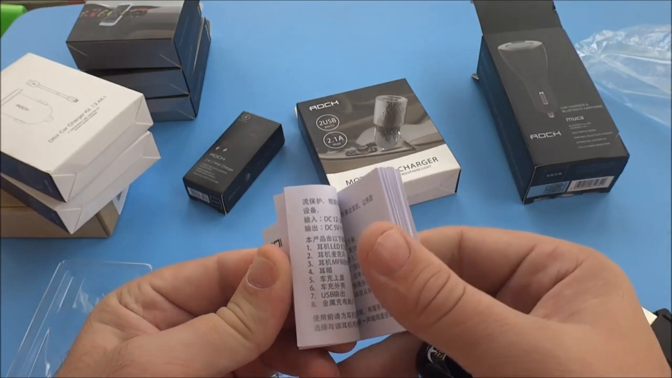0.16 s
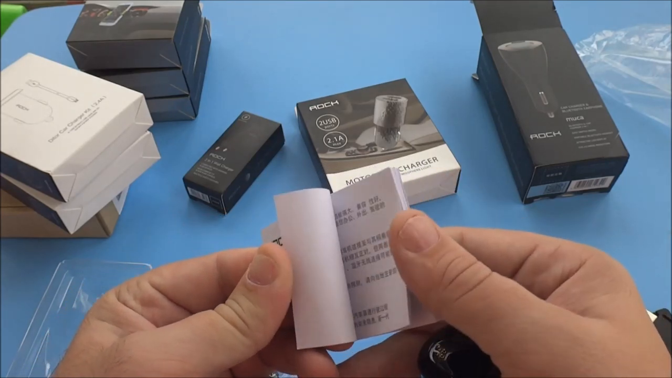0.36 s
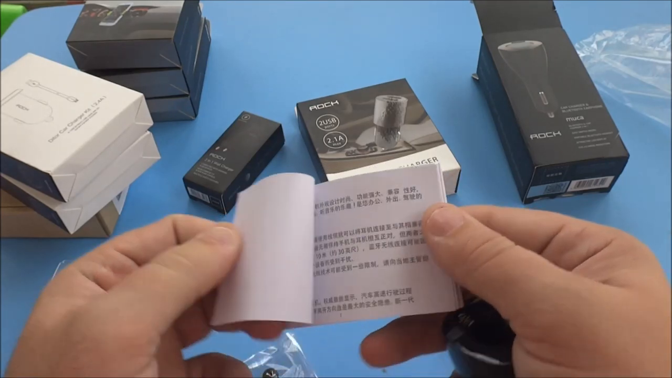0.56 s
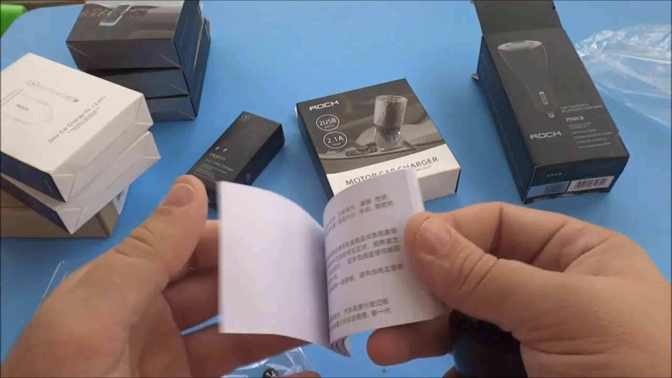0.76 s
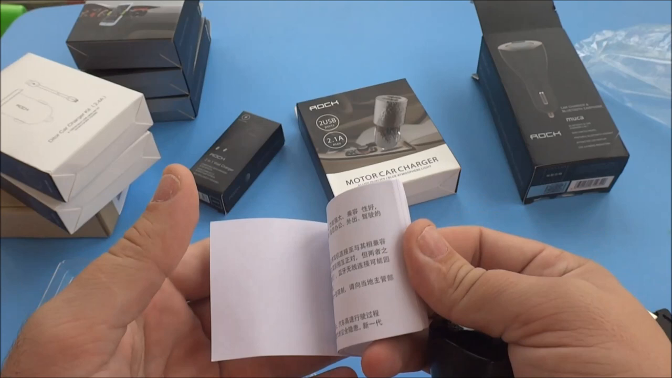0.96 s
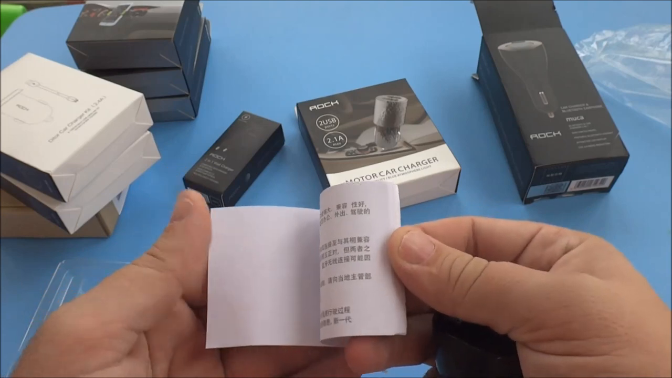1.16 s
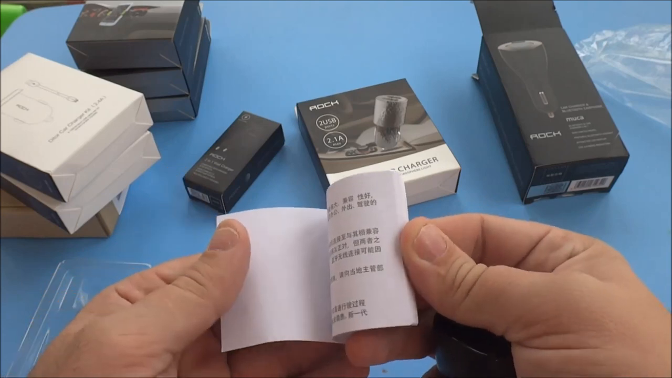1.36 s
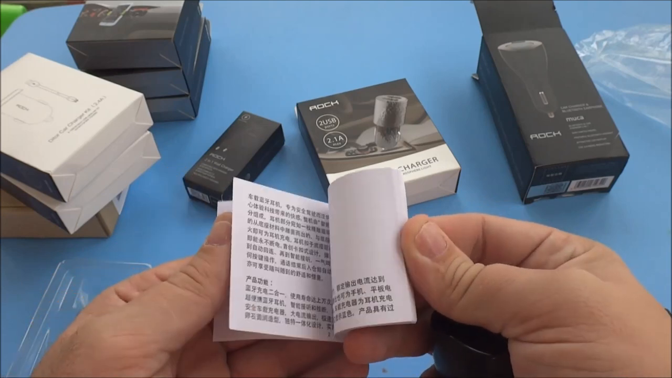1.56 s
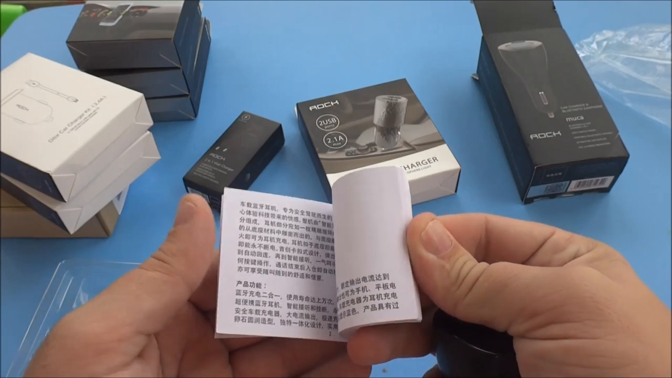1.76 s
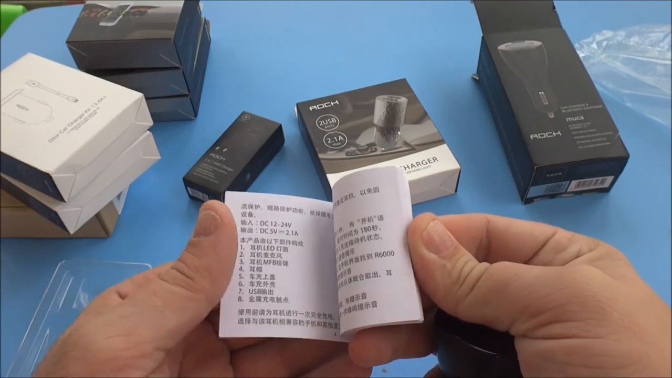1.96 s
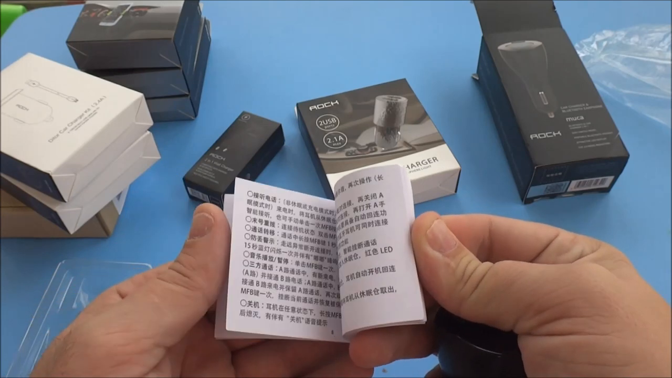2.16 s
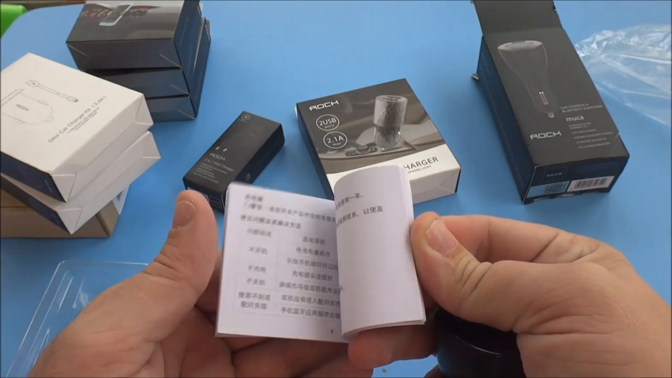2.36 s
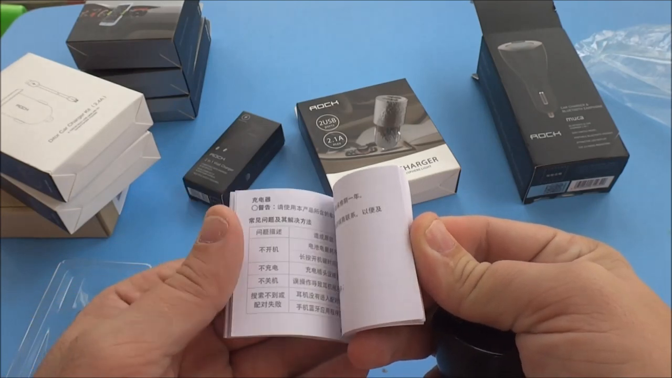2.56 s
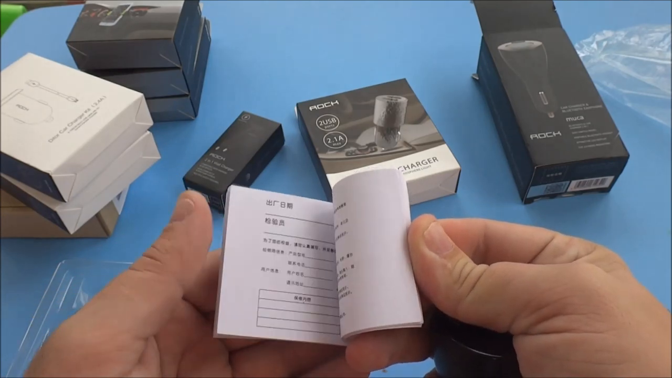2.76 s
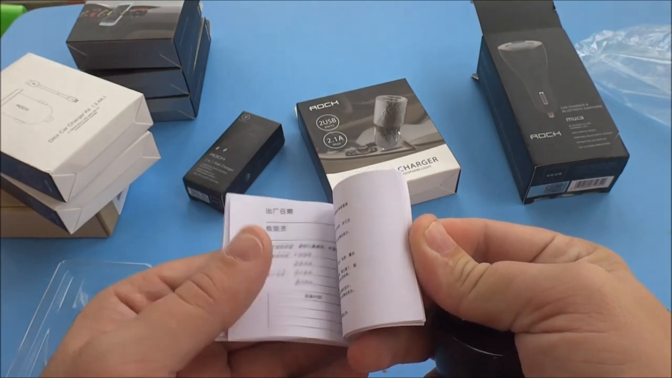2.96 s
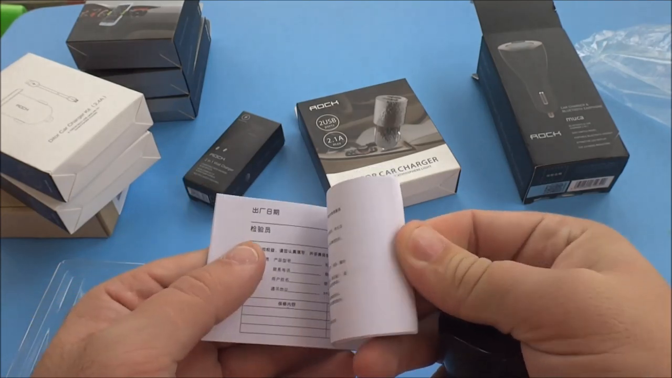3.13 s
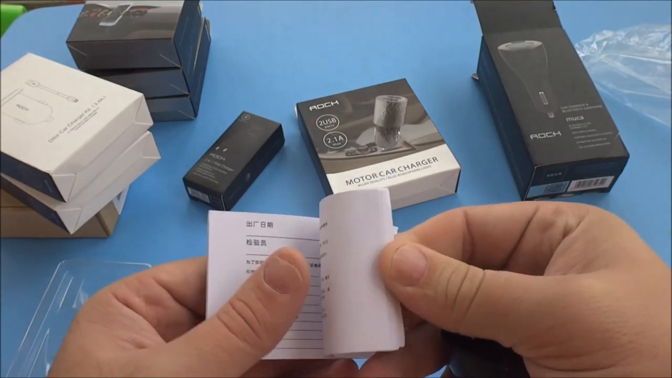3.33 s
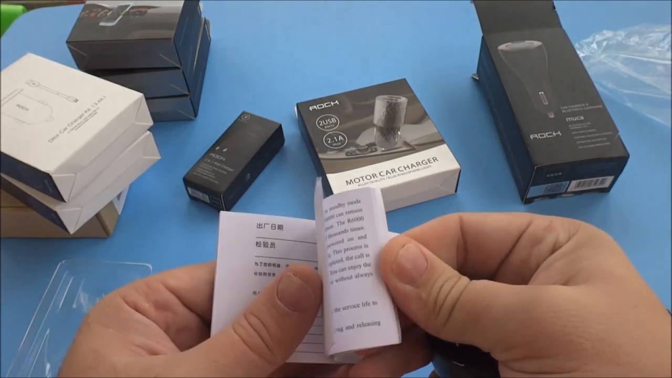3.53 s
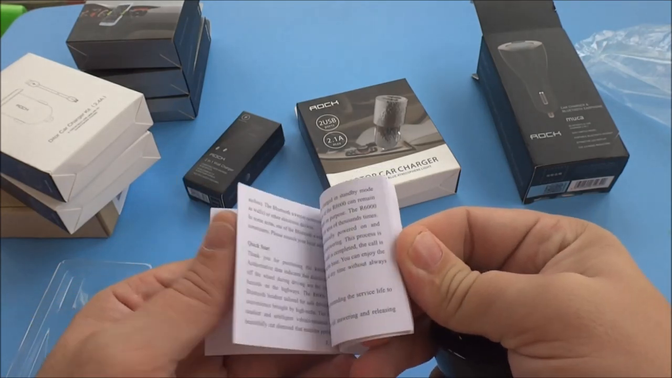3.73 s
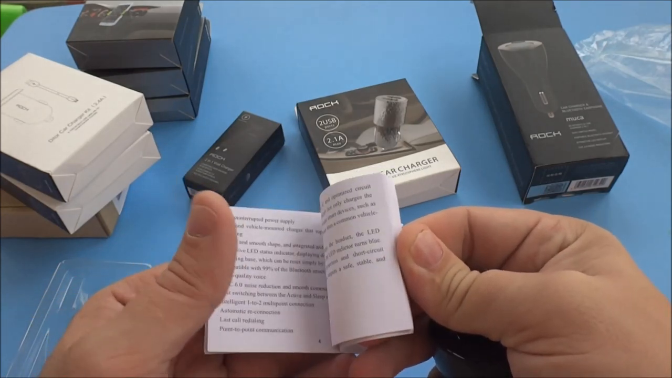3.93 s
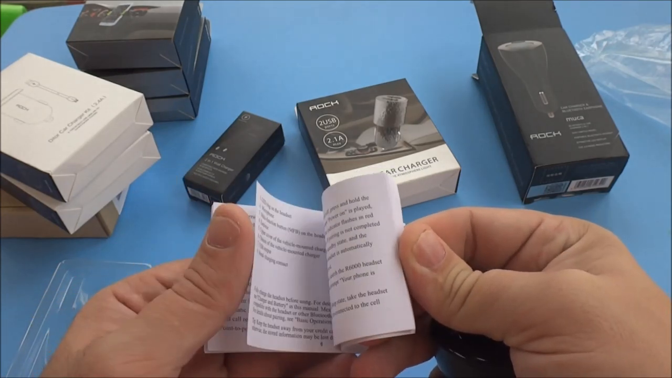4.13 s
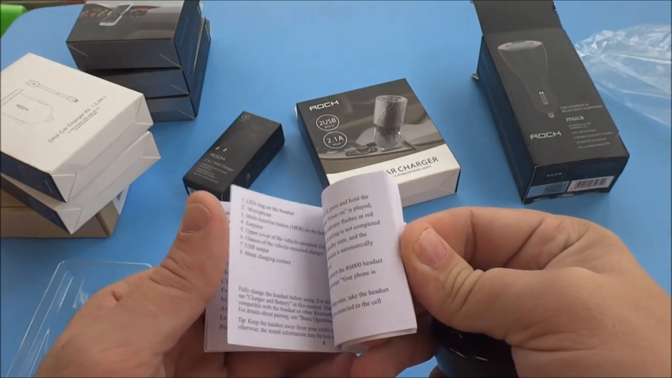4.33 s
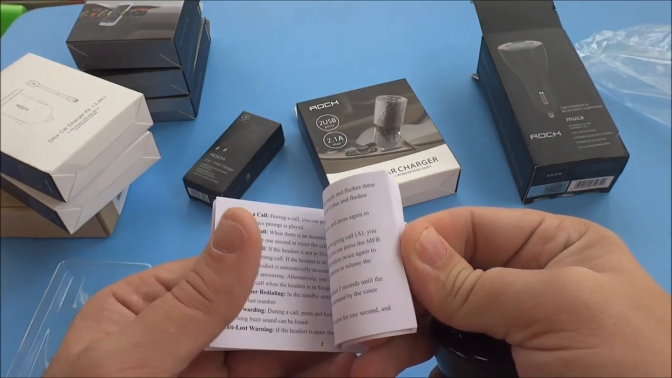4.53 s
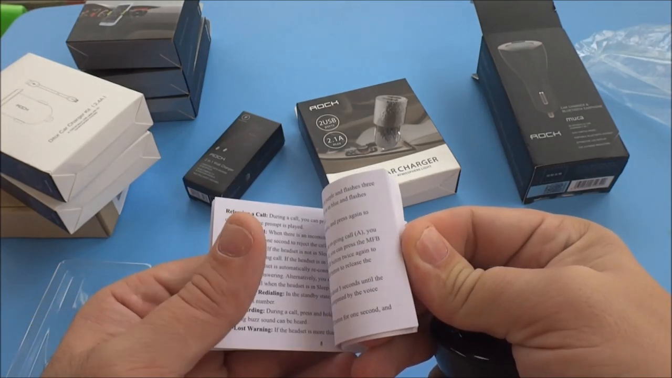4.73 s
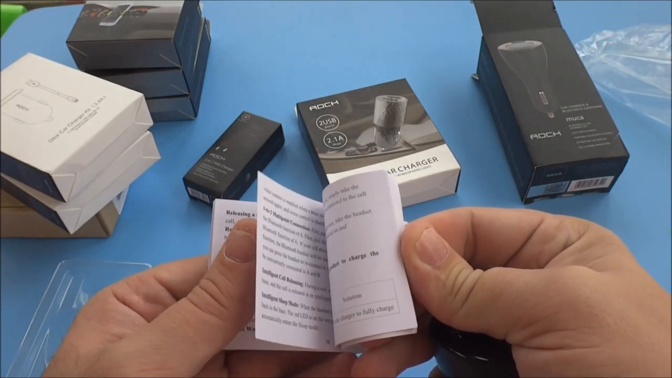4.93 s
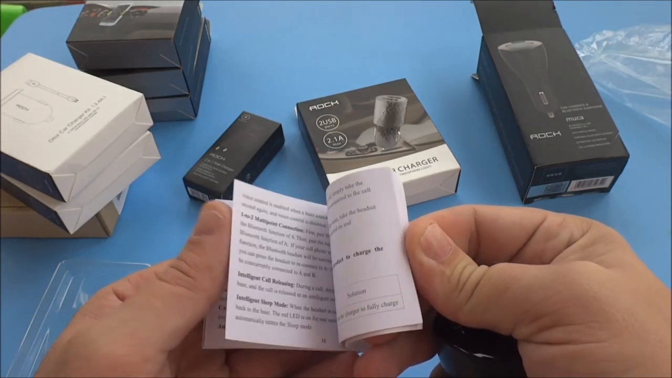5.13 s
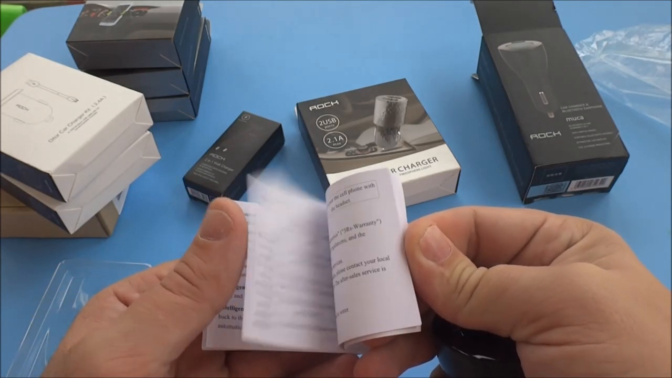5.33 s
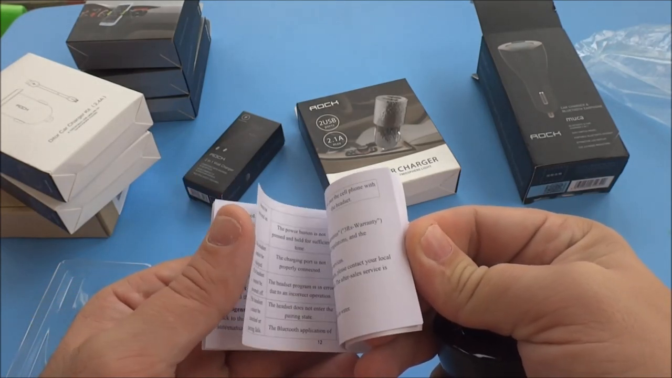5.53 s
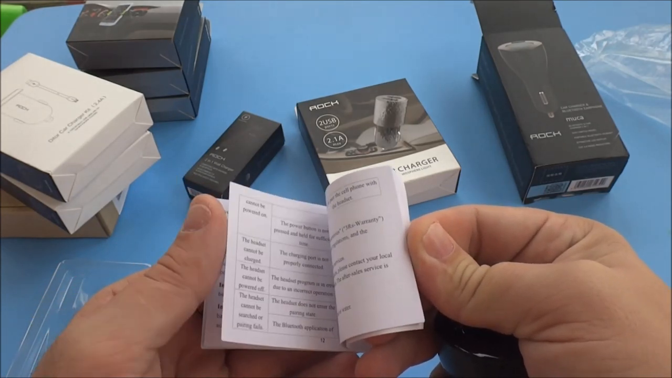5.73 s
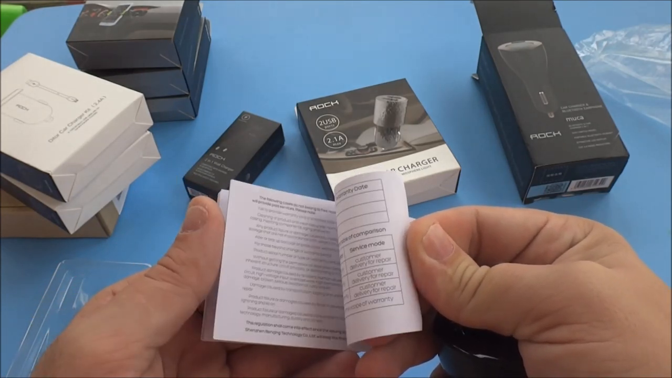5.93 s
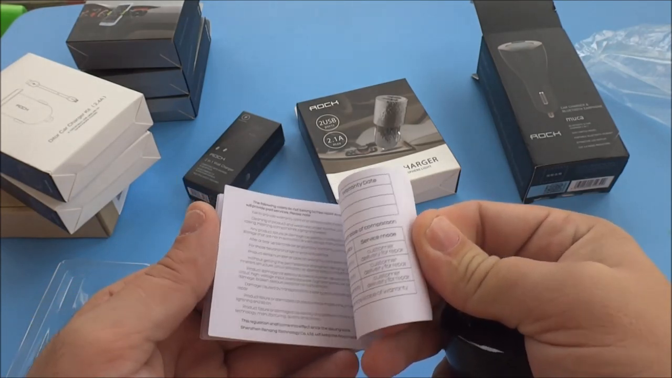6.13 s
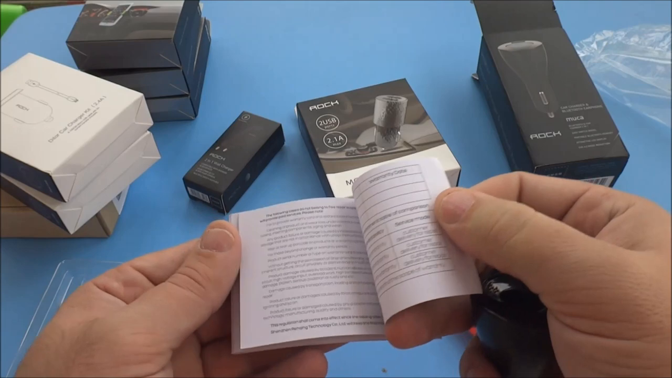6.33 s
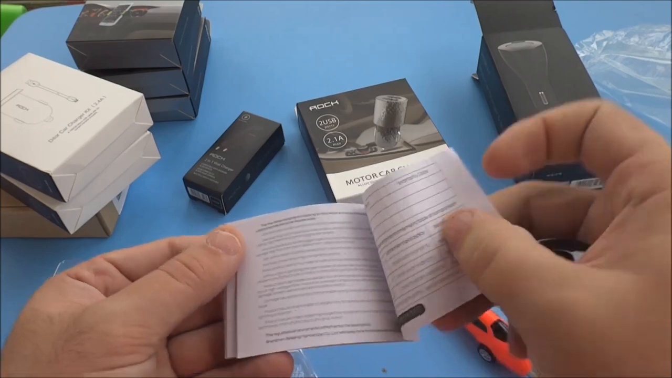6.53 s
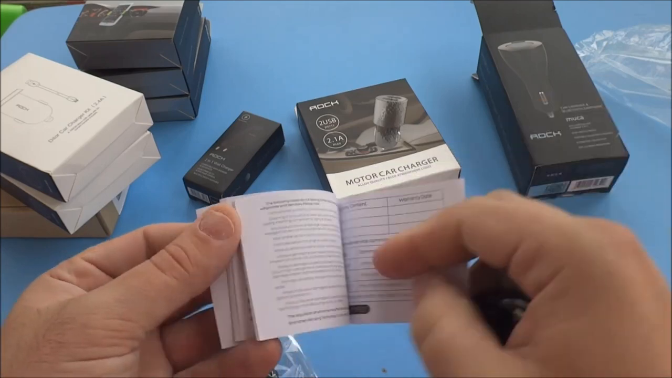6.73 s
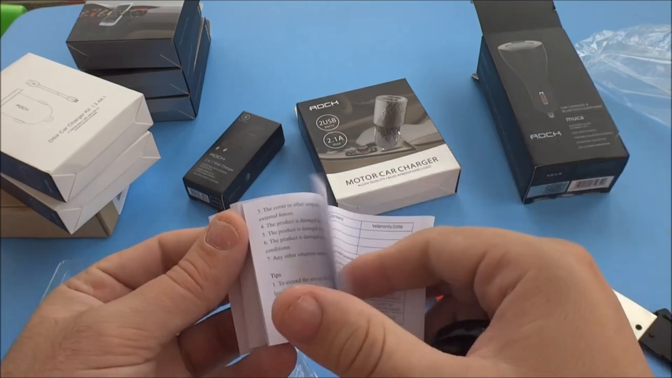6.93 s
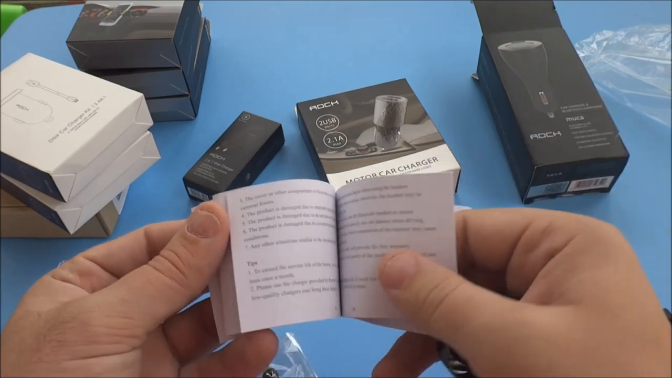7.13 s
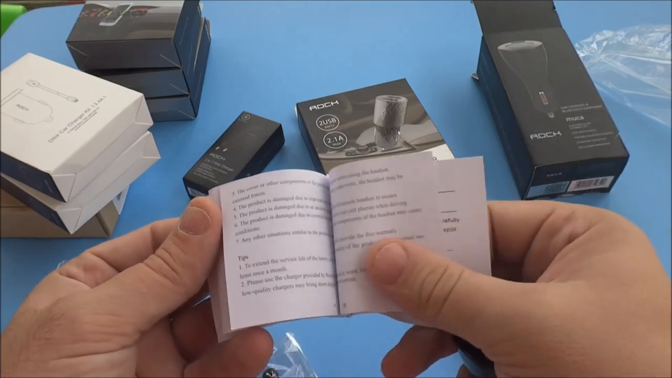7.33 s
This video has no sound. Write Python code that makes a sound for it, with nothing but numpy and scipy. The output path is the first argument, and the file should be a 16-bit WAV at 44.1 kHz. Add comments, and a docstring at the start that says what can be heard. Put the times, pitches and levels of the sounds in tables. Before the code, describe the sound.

A small paper booklet is leafed through by hand, very close, in a quiet room with a short, light ring. Soft rubbing starts at once, then a rapid riffle of four strong, crisp flicks around 0.25 seconds and another at 0.6, with a papery swish to 0.8. It is nearly still until small ticks near 1.2 and a flick and slap at 1.5. From 1.85 to 3 come separate bright page ticks, with a strong slap at 3.03. Slaps and rubbing cluster around 3.45; flicks, hollow flaps and short swishes continue through 4 to 5.4, with a sharp double tick at 5.86. From 6.3 the rustling grows loud and dense, with stack kneading, slaps near 6.5 and 6.9, and a hard slap at 7.17 before a bright final swish. Low hum, faint whine and a tiny regular high buzz persist throughout.

```python
"""In a quiet room, hands flip through a small paper booklet just under a camera.
Each page edge ticks off the thumb, and pages often slap down a moment later: short bursts of shaped noise.
Fingers and sheets rub in between: longer strokes of noise made of many tiny slips.
A table and the room throw these sounds back, over a low hum, a thin whine and a faint buzz of high ticks."""
import sys
import numpy as np
from scipy import signal
from scipy.fft import rfft, irfft, next_fast_len
from scipy.io import wavfile
from scipy.ndimage import uniform_filter1d

SR = 44100
rng = np.random.default_rng(int(sys.argv[2]) if len(sys.argv) > 2 else 0)


def output_pcm(signal):
    """Save a mono or channel-first signal as 16-bit PCM at the path in sys.argv[1].

    Samples are clipped to [-1, 1] before scaling.
    """
    pcm = np.clip(np.atleast_2d(signal).T, -1, 1) * 32767
    wavfile.write(sys.argv[1], SR, np.round(pcm).astype(np.int16))


N = 325458  # samples, about 7.4 seconds

# Hum of the room. Each row: frequency in Hz, level per Hz in dB relative to the other rows.
HUM_COLOUR = [(13, -28), (22, -10), (186, -0.5), (245, -2.5), (314, -12.5), (403, -12.5), (476, -13),
              (562, -15.5), (1220, -19), (1480, -28.5), (3310, -20.5), (4610, -25), (12200, -21.5),
              (15200, -57), (16500, -42)]
# How alike the hum is at left and right. Each row: frequency in Hz, likeness from -1 (opposite) to 1 (same).
HUM_LIKENESS = [(60, 0.98), (180, 0.91), (550, -0.27), (1650, -0.61), (4970, -0.29), (15000, 0.88)]
HUM_DB = -47.5
WHINE_HZ, WHINE_DB = 1443, -63.5  # a faint fuzzy whine in the hum

# What the buzz rings with. Each row: frequency in Hz, level in dB, time to fall 60 dB in seconds,
# left over right in dB.
BUZZ_RINGS = [(9800, -8, .003, 0), (11200, 0, .005, -11), (12400, -5, .004, -1), (14700, -4, .003, 0)]
BUZZ_PER_S, BUZZ_START_S = 50, .0001
BUZZ_DB, BUZZ_VARIES_DB = -39, 1.5  # typical strength of a tick before its rings, and its random spread

# Broad ringing of the bent page. Each row: frequency in Hz, width in Hz, level in dB.
SHEET_RINGS = [(6120, 1500, -9), (7500, 2100, -8), (4760, 880, -15.5)]
# Ringing of its thin free edge. Each row: frequency in Hz, width in Hz, level in dB.
EDGE_RINGS = [(12220, 3800, -1.5), (14800, 1800, -5.5)]
# Ringing of the page stack in the hand. Each row: frequency in Hz, width in Hz, level in dB.
STACK_RINGS = [(390, 330, -6), (860, 440, -9.5), (1910, 800, -5.5)]
# How alike the page sounds are at left and right. Each row: frequency in Hz, likeness from 0 to 1.
PAGE_LIKENESS = [(800, .8), (2500, .96), (6800, .97), (8300, .84), (9500, .55), (10700, .95), (13200, .985)]

# Strokes of skin and sheet sliding. Each row: peak time in seconds, sheet level in dB, ms to rise 20 dB,
# ms held, ms to fall 20 dB, edge over sheet in dB, air pocket over sheet in dB.
STROKE_ROWS = [(0.038, -35, 99, 3.3, 61, -1.5, -5.5), (.104, -29.5, 14, 11.4, 46, -6, -10.5),
               (.17, -46, 100, 33, 430, 1.5, -8), (0.494, -36.5, 39, 37, 125, 2, -8.5),
               (0.643, -37.5, 74, 80, 100, 5, -3.5), (.765, -31.5, 35, 13.4, 57, -3, -6),
               (.83, -56, 60, 61, 399, -7, 8), (.92, -47, 70, 20, 60, 2.5, -16),
               (1.1, -55, 93, 46, 400, -2, -14), (1.35, -50.5, 55, 7.6, 44, 5, -9),
               (1.6, -56, 300, 31, 300, 0, -7), (1.745, -44, 68, 19, 70, -19, -13),
               (1.838, -44, 17, 4.4, 35, 2, -12), (2.735, -46, 34, 15, 60, -15, -12),
               (2.7, -51, 1000, 80, 397, -13, -20), (3.22, -39.5, 84, 40, 117, 0.5, -8),
               (3.416, -42.5, 113, 10, 163, -1, -2), (3.675, -39, 248, 12, 100, -6, -8),
               (3.74, -43.5, 700, 127, 28, -0.5, -9), (3.902, -35.5, -2, 3, 34, 3, -5),
               (4.238, -36.5, 8, 7.4, 32, -5, -5.5), (4.251, -28.5, 20, 8, 26.5, -4.5, -10),
               (4.316, -35, 51, 5.5, 22, -6, -6.5), (4.355, -41, 22, 30, 41, -4, -5),
               (4.886, -35, 13, 6, 53, -6, -3), (4.93, -54, 50, 16, 248, -3, 2),
               (5.2, -40.5, 445, 46, 26, -3, -10), (5.668, -32, 28, 7.6, 18, -14, -18),
               (5.7, -38.5, 40, 11, 72, -12, -11), (5.875, -35.5, 21, 8.7, 70, 2.5, -3),
               (5.95, -48, 200, 10, 340, -2, -3), (6.186, -44, 36, 140, 300, 3, -5.5),
               (6.337, -30.5, 29, 60, 100, -2, -17), (6.417, -22.5, 10, 28, 80, 4.5, -7.5),
               (6.54, -27, 114, 42, 190, -0.5, -7), (6.712, -29, 135, 26, 111, 2, -6.5),
               (6.9, -30.5, 38, 30, 160, -5, -8.5), (7.01, -36.5, 200, 21, 150, -1, -11),
               (7.105, -36.5, 100, 8.7, 38, -1, -7), (7.163, -23.5, 4.5, 8, 44, 1, -7),
               (7.23, -37.5, 77, 11, 120, 0.5, -3.5), (7.302, -21, 10.5, 17, 400, 5, -11.5)]
# The fingers never rest quite still: sheet level, then edge and pocket over it.
HOLD_DB, HOLD_EDGE_DB, HOLD_POCKET_DB = -59.5, 4, -0.5
# The hand regrips and kneads the page stack. Each row: time in seconds, level in dB.
KNEADING = [(0, -71), (6.4, -59.5), (6.45, -44), (6.49, -60), (6.55, -41), (6.66, -56), (6.8, -45.5),
            (6.85, -54), (6.93, -41), (7.1, -52.5), (7.22, -48), (7.29, -78), (7.38, -62)]

# Page edges flick off the thumb. Each row: time in seconds, sheet level in dB, edge over sheet in dB,
# air pocket over sheet in dB.
FLICK_ROWS = [(0.049, -25.5, 0, -21), (.1906, -39, 2, -7), (.1984, -31, 0, -18), (.2317, -9.5, -3, -16),
              (0.2471, -12, -2, -11), (.2601, -13.5, -.5, -35), (0.2756, -17, -4, -20),
              (0.4653, -32, -6, -16), (0.5919, -12.5, -12, -19), (1.172, -42.5, -8, -2),
              (1.198, -34, 0, -21), (1.5056, -45, 17, -8), (1.519, -22.5, 9, -14.5),
              (1.848, -34.5, 10, -12), (1.856, -19, 6, -25), (1.9125, -26, 0, -22), (1.921, -41, -5, 2.5),
              (2.1, -41, 6, -20), (2.218, -36, 1, -14), (2.126, -19.5, 7.5, -26), (2.377, -19, 7.5, -20.5),
              (2.444, -32.5, 9.5, -16), (2.6074, -28.5, 1, -33), (2.6405, -16.5, 2, -23.5),
              (2.735, -18.5, -27, -40), (2.7596, -33, 7, -14), (2.775, -19, 4.5, -22.5),
              (2.992, -34, 2, -30), (3.006, -24, -16, -29), (3.05, -16, -21, -20), (3.4238, -26, 15, -22),
              (3.7762, -22, 1, -36), (3.9079, -15, 3, -42), (4.0661, -22.5, 9, -23),
              (4.4687, -17, 2.5, -19.5), (4.832, -24, -3, -29), (4.838, -25, 13.5, -26),
              (5.358, -26.5, 17, -23), (5.8546, -17, 7, -19), (5.8582, -13, 3, -23), (6.532, -14.5, 0, -17),
              (6.874, -15.5, -1.5, -16)]
FLICK_POCKET_HZ, FLICK_THUMP_DB = 3410, -54  # the thump is relative to the sheet
FLICK_MS, FLICK_SIDE_DB = 1.36, -.8  # time scale of the snap, left over right
# Pages slap down on the stack. Each row: time in seconds, sheet level in dB, edge over sheet in dB,
# air pocket over sheet in dB, pocket frequency in Hz, thump over sheet in dB.
SLAP_ROWS = [(1.5601, -18.5, -7, -16.5, 2170, -16), (2.1705, -27.5, -4, -7, 4540, -14.5),
             (2.6786, -19, -13, -16.5, 3140, -22), (3.033, -10.5, -7, -9.5, 3820, -26.5),
             (3.44, -19, -3, -2, 3900, -13), (3.4433, -19.5, -19, -5, 2950, -9.5),
             (3.4927, -24, 6, -8, 4700, -15), (4.096, -19, -3, 6, 3110, -16.5),
             (4.3016, -29.5, -2, -12, 3270, -13), (4.7069, -35, 2, -10.5, 3170, -11),
             (4.8677, -17.5, 0, 3.5, 3980, -13), (5.3881, -20.5, 0, 7.5, 3170, -30),
             (5.8772, -30, -8, -15, 2900, -2.5), (5.8856, -35, -5, 9, 3160, -3),
             (5.9068, -16, -2, -6, 2340, -13), (6.17, -38.5, -2.5, -22, 2920, -13),
             (6.5198, -18, -11, -20, 4240, -14.5), (6.7836, -31, -5, 0.5, 4500, -1),
             (6.7952, -26.5, -1, -10, 2660, -5.5), (6.8901, -16, -5, -8, 3150, -42),
             (6.8925, -21, -9, 4.5, 3140, -18), (6.9085, -25.5, 7.5, -19, 3100, -9),
             (7.1066, -33.5, -1, -20, 3000, -3), (7.1692, -11.5, -1, -13.5, 3760, -17.5)]
SLAP_MS, SLAP_SIDE_DB = 2.26, 0.7  # time scale of the snap, left over right

# Echoes from near surfaces. Each row: delay in ms, level in dB.
NEAR_ECHOES = [(5.2, -27), (10.7, -17.5)]
# How long the room rings. Each row: frequency in Hz, time to fall 60 dB in seconds.
ROOM_RING = [(500, 1), (1500, 0.38), (3200, 0.44), (7000, 0.37), (13000, 0.16)]
# The microphone pair, its left port shaded around 9 kHz. Each row: frequency in Hz, left over right in dB.
PORT_LEAN = [(3000, .3), (6800, -.3), (8100, -3.2), (9500, -5.5), (10700, -1.1), (13200, 0)]
TOP_HZ = 16000  # the microphones pass little above this


def gain_of(db):
    """Turn decibels into a plain multiplier."""
    return 10 ** (np.asarray(db) / 20)


def evened(x):
    """Scale to an rms of 1."""
    return x / np.sqrt(np.mean(x ** 2) + 1e-20)


def read(points, hz):
    """Read a curve off a two-column table, in straight lines over log frequency."""
    f, value = np.transpose(points)
    return np.interp(np.log(hz + 1), np.log(f + 1), value)


def humps(rings, hz):
    """Gain over frequency of a few broad resonances, rms 1 over all bins."""
    power = sum((gain_of(db) / (1 + (2 * (hz - f) / width) ** 2)) ** 2 for f, width, db in rings)
    return evened(np.sqrt(power))


def alike(a, b, same):
    """Left and right from two separate noises: the right shares the given part of the left."""
    return np.array([a, same * a + np.sqrt(1 - same ** 2) * b])


def drifting_patches(bins, frames, tall, long):
    """Random ups and downs of rms 1, smoothed over frequency and then over time."""
    over_hz = uniform_filter1d(rng.standard_normal((bins, frames)), tall, 0)
    return evened(uniform_filter1d(over_hz, long, 1))


def hum():
    """Ventilation rumble and faint hiss with drifting patches, and a thin whine from a narrow band of noise."""
    frames, hz = N // 512 + 5, np.fft.rfftfreq(2048, 1 / SR)
    real, imaginary = rng.standard_normal((2, 2, 1025, frames))
    a, b = real + 1j * imaginary
    noise = alike(a, b, read(HUM_LIKENESS, hz)[:, None])
    patches = drifting_patches(1025, frames, 12, 8)
    air = noise * gain_of(read(HUM_COLOUR, hz)[:, None] + 0.86 * patches)
    whine = noise * humps([(WHINE_HZ, 70, 0)], hz)[:, None]
    air, whine = (evened(signal.istft(v, nperseg=2048, noverlap=1536)[1][:, :N]) for v in (air, whine))
    return gain_of(HUM_DB) * air + gain_of(WHINE_DB) * whine


def buzz():
    """A faint, very regular high tick inside the camera body; its main ring is nearer the right port."""
    t = np.arange(300) / SR
    ring = 0
    for hz, db, t60, left_db in BUZZ_RINGS:
        fade = gain_of(db - 60 * t / t60 + np.array([[left_db], [0]]))
        ring = ring + fade * np.sin(2 * np.pi * hz * t)
    at = np.arange(BUZZ_START_S, N / SR, 1 / BUZZ_PER_S)
    train = np.zeros((1, N))
    train[0, (at * SR).astype(int)] = gain_of(BUZZ_DB + BUZZ_VARIES_DB * rng.standard_normal(len(at)))
    return signal.oaconvolve(train, ring, axes=1)[:, :N]


def strokes(t):
    """Level of sheet, then edge and pocket over it, in dB: each stroke swells, holds and dies away."""
    s, db, rise_ms, held_ms, fall_ms, edge_db, pocket_db = np.transpose(STROKE_ROWS)[:, :, None]
    ms = 1000 * (t - s)
    rising = -ms / np.maximum(rise_ms, 1)
    falling = np.maximum(ms - held_ms, 0) / np.maximum(fall_ms, 1)
    away = np.maximum(rising, falling)  # 1 means 20 dB below the peak

    def level(part_db, rest_db):
        """Add the power of all strokes to that of the resting fingers."""
        power = (gain_of(db + part_db - 20 * away) ** 2).sum(0)
        return 10 * np.log10(power + gain_of(HOLD_DB + rest_db) ** 2)

    sheet = level(0, 0)
    return sheet, level(edge_db, HOLD_EDGE_DB) - sheet, level(pocket_db, HOLD_POCKET_DB) - sheet


def rubbing():
    """Skin and sheets slide: dense tiny slips in clumps, coloured by sheet, edge, air pocket and stack."""
    clumps = evened(uniform_filter1d(rng.standard_normal(N), 130))
    slips = gain_of(1.65 * clumps + 1.96 * np.minimum(rng.exponential(1, N), 4))
    rough = evened(slips * rng.standard_normal((2, N)))
    hz, t, (a, b) = signal.stft(rough, SR, nperseg=128, noverlap=96)
    db, edge_db, pocket_db = strokes(t)
    knead_db = np.interp(t, *np.transpose(KNEADING)) - db  # relative to the sheet
    pocket_rings = [(3570, 2360, 28.0), (1990, 570, -40)]
    parts = [(SHEET_RINGS, 0), (EDGE_RINGS, edge_db), (pocket_rings, pocket_db), (STACK_RINGS, knead_db)]
    power = sum((humps(rings, hz)[:, None] * gain_of(part_db)) ** 2 for rings, part_db in parts)
    patches = drifting_patches(65, len(t), 4, 50)
    noise = alike(a, b, read(PAGE_LIKENESS, hz)[:, None])
    coloured = noise * np.sqrt(power) * gain_of(db + 2.0 * patches)
    return signal.istft(coloured, nperseg=128, noverlap=96)[1][:, :N]


def tick(row, noise):
    """A burst of slips shakes sheet and edge; the squeezed air pocket and the stack answer a little later."""
    s, db, edge_db, pocket_db, pocket_hz, thump_db, snap_ms, side_db = row
    size = noise.shape[-1]
    t = (np.arange(size) - 512) / SR * 1000  # ms from the moment of the tick
    hz = np.fft.rfftfreq(size, 1 / SR)
    snap = np.exp(-abs(t) / (snap_ms * np.where(t < 0, .3, .5)))
    burst = snap + 0.24 * np.exp(-abs(t) / np.where(t < 0, 2.2, 3.1))
    swell = np.exp(-((t - 1.9) / 2.04) ** 2) + 0.17 * np.exp(-t / 14.0) * (t > 0)
    thump = np.exp(-abs(t - 1.5) / np.where(t < 1.5, 1.1, 6.5))
    pocket_rings = [(pocket_hz, 800, 0), (0.8 * pocket_hz, 800, -11), (1.47 * pocket_hz, 1500, -14)]
    parts = [(0, SHEET_RINGS, burst), (edge_db, EDGE_RINGS, burst),
             (pocket_db, pocket_rings, swell), (thump_db, STACK_RINGS, thump)]
    same, out = read(PAGE_LIKENESS, hz), np.zeros((2, size))
    for (part_db, rings, shape), (a, b) in zip(parts, noise):
        wave = irfft(alike(rfft(a * shape), rfft(b * shape), same) * humps(rings, hz))
        # the envelope alone sets the energy, whatever the noise happened to be
        out += gain_of(part_db) * wave * np.linalg.norm(shape) / np.linalg.norm(wave[0])
    return gain_of(db + side_db * np.array([[.5], [-.5]])) * out


def ticks():
    """Flicks and slaps, each placed at its moment; a few slips in each burst stand out."""
    rows = [(*r, FLICK_POCKET_HZ, FLICK_THUMP_DB, FLICK_MS, FLICK_SIDE_DB) for r in FLICK_ROWS]
    rows += [(*r, SLAP_MS, SLAP_SIDE_DB) for r in SLAP_ROWS]
    noise = rng.standard_normal((len(rows), 4, 2, 2048))  # four parts, two channels
    noise *= gain_of(1.92 * np.minimum(rng.exponential(1, (len(rows), 1, 1, 2048)), 4))
    mix = np.zeros((2, N + 2048))
    for row, slips in zip(rows, noise):
        at = round(row[0] * SR) - 512
        mix[:, at:at + 2048] += tick(row, slips)
    return mix[:, :N]


def room(x):
    """A few near echoes, and sparse taps of random sign, each band dying at its own speed."""
    size = SR // 2
    taps = np.zeros((2, size))
    slots = np.arange(160, size - 20, 20)
    at = slots + rng.integers(0, 20, (2, len(slots)))  # one tap somewhere in each slot
    np.put_along_axis(taps, at, rng.choice([-1., 1.], at.shape), 1)
    hz, t, (a, b) = signal.stft(taps, SR, nperseg=256)
    same = read(PAGE_LIKENESS, hz)[:, None] ** 3  # the tail is less alike at the two ports than the direct sound
    fade = gain_of(-60 * t / read(ROOM_RING, hz)[:, None])
    tail = signal.istft(alike(a, b, same) * fade, SR, nperseg=256)[1]
    tail = gain_of(-10.0) * tail / np.linalg.norm(tail, axis=1, keepdims=True)
    for ms, db in NEAR_ECHOES:
        tail[:, round(ms * SR / 1000)] += gain_of(db)
    return signal.fftconvolve(x, tail, axes=1)[:, :N]


def scene():
    """Add up the sounds; the room answers the page sounds, and the rubbing less strongly."""
    near, slide = ticks(), rubbing()
    return hum() + buzz() + slide + near + room(near + 0.47 * slide)


def record(dry):
    """The two microphone ports differ a little in the treble; peaks overload; the top is cut off."""
    size = next_fast_len(N)
    lean_db = read(PORT_LEAN, np.fft.rfftfreq(size, 1 / SR)) * np.array([[.5], [-.5]])
    leaned = irfft(rfft(dry, size) * gain_of(lean_db), size)[:, :N]
    overloaded = np.clip(leaned, -.92, .92)
    low_pass = signal.firwin(401, TOP_HZ, window=("kaiser", 9), fs=SR)
    return signal.oaconvolve(overloaded, low_pass[None], "same")


dry = scene()
out = record(dry)
output_pcm(out)
```